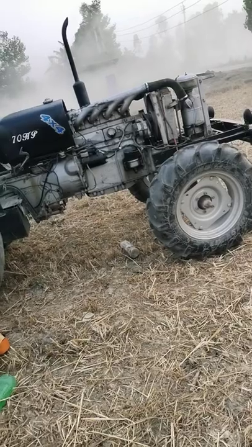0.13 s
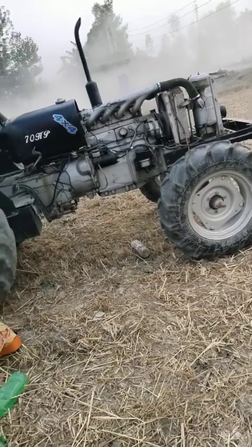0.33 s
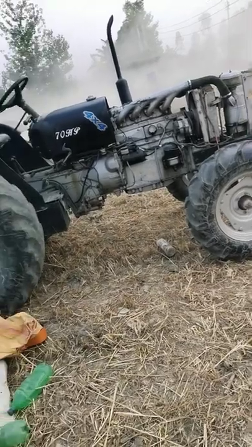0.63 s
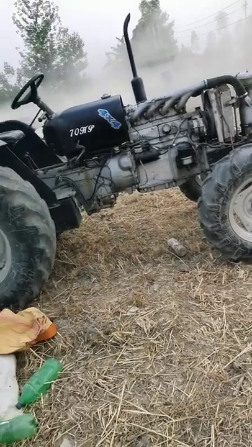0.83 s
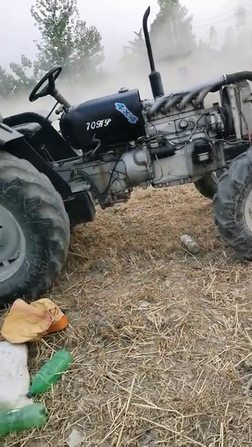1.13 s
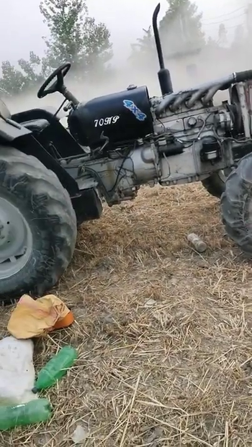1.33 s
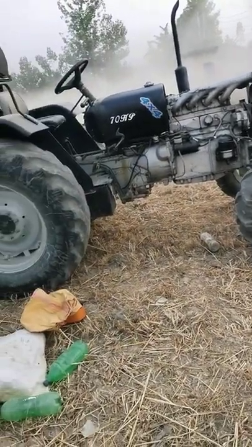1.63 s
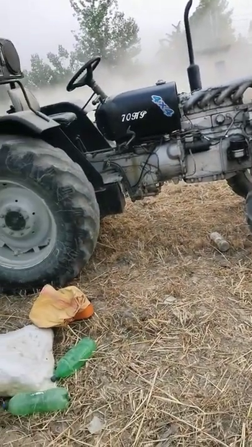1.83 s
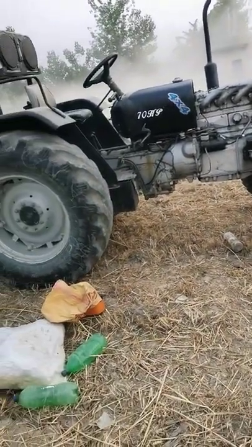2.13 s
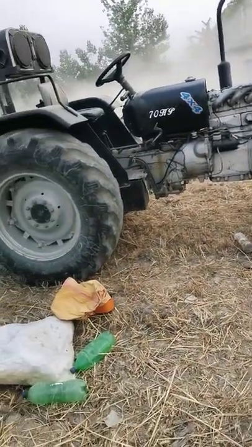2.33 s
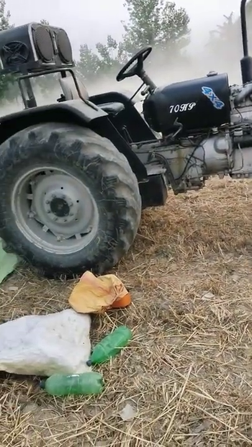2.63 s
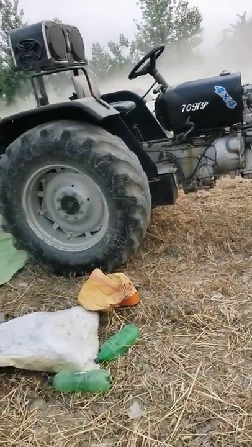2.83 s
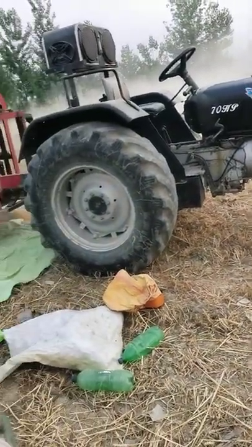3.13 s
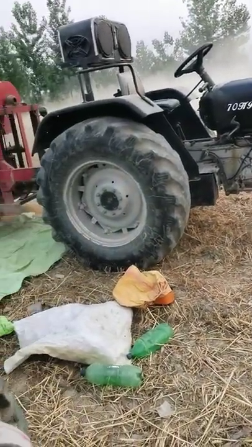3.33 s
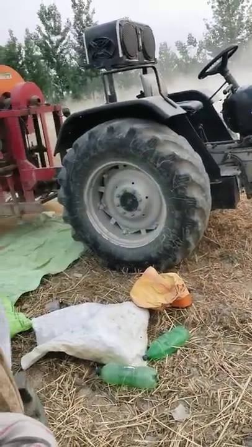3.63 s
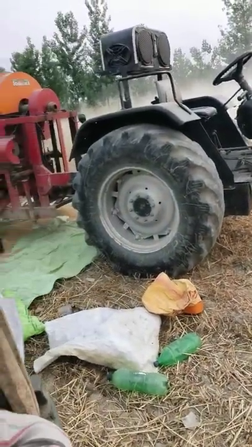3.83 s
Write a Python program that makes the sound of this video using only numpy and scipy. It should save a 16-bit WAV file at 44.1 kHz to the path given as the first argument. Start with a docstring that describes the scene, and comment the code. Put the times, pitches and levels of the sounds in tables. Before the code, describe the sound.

Tractor diesel engine clatters loudly, then drops to a muffled, patchy roar of a thresher

```python
"""Diesel tractor driving a thresher

A four-cylinder engine drones as harmonics of its cycle rate, its cylinders knock as decaying noise bursts
and its gears whine as fluttering lines. The thresher roars as coloured noise, its housing booms as a narrow
noise band, a midrange band swells several times, and grain pelts it as small rings; brief fluttering tones
and a whistle stand out. The microphone opens abruptly and turns to the thresher; a noise suppressor then
turns the sound down and leaves it patchy."""
import sys
import numpy as np
from scipy import signal
from scipy.fft import rfft, irfft
from scipy.io import wavfile
from scipy.ndimage import uniform_filter1d

SR = 44100
rng = np.random.default_rng(int(sys.argv[2]) if len(sys.argv) > 2 else 0)


def master_out(mix):
    """Clip the mix to full scale and print it as 16-bit PCM to the path in sys.argv[1]."""
    frames = np.transpose(np.atleast_2d(mix))
    ceiling = np.clip(frames, -1, 1)
    pcm = np.round(ceiling * 32767).astype(np.int16)
    wavfile.write(sys.argv[1], SR, pcm)


N = 176400
T = np.arange(N) / SR  # s

# cylinders in firing order: place in the cycle/0-1, relative knock level/dB, knock decay/s,
# relative clatter level/dB
CYLINDER_FIRINGS = [(.001, 13, 0.0026, 6), (0.261, 7.5, 0.0069, 7.5), (0.512, 2, 0.0072, 6.5),
                    (0.746, -11, 0.0037, 7.5)]
# resonant response of the engine block: f/Hz, relative level/dB
BLOCK_RESPONSE = [(500, -20), (1400, -13.5), (1850, 1.5), (2080, -1.5), (2280, 4.5), (2550, -6),
                  (2850, -14), (4800, -21.5), (6500, -34), (8000, -34), (11000, -41), (15000, -37)]
# spectrum of the thresher's roar and pelting: f/Hz, relative level/dB
ROAR_SPECTRUM = [(30, -25), (60, -1), (100, -21), (240, -12.5), (390, -2.5), (520, -6.5), (640, -22.5),
                 (800, -23), (1100, -9.5), (1550, -10.5), (1750, -24), (2200, -11.5), (2850, -21.5),
                 (3300, -22.5), (5300, -33), (6400, -40.5), (9800, -43), (12300, -51.5), (14200, -46),
                 (15400, -70)]


def from_db(db):
    """Level to amplitude: 20 dB is a factor of ten."""
    return 10 ** (np.asarray(db) / 20)


def rms_one(x):
    """Normalisation by the root mean square."""
    return x / np.sqrt(np.mean(np.abs(x) ** 2) + 1e-20)


def in_time(rows):
    """Linear interpolation of each column over the time in the first."""
    s, *columns = np.transpose(rows)
    return [np.interp(T, s, column) for column in columns]


def drift(hz):
    """Random modulation: noise through a two-pole low-pass, computed at a reduced rate; rms 1."""
    step, settling = 40, 2000  # samples per slow sample, slow samples discarded
    r = np.exp(-2 * np.pi * hz * step / SR)
    noise = rng.standard_normal(N // step + settling + 2)
    slow = signal.lfilter([1], [1, -2 * r, r * r], noise)[settling:]
    return np.interp(np.arange(N) / step, np.arange(len(slow)), rms_one(slow))


def colour(x, spectrum):
    """Minimum-phase filtering: folding the cepstrum makes the given spectrum causal; rms 1."""
    hz, db = np.transpose(spectrum)
    size = 2 * N
    bins_hz = np.arange(N + 1) * SR / size
    level_db = np.interp(np.log(bins_hz + 1), np.log(hz), db)
    cepstrum = irfft(np.log(from_db(level_db)))
    cepstrum[1:N] *= 2
    cepstrum[N + 1:] = 0
    response = np.exp(rfft(cepstrum))
    return rms_one(irfft(rfft(x, size) * response)[:N])


def tone(turns, rough, flutter_hz):
    """Quadrature modulation: a sinusoid flutters in amplitude and phase; rms 1."""
    angle = 2 * np.pi * (turns + rng.random())
    in_phase = (1 + rough * drift(flutter_hz)) * np.cos(angle)
    quadrature = rough * drift(flutter_hz) * np.sin(angle)
    return rms_one(in_phase + quadrature)


def burst(times, db, decay_s):
    """Impulse excitation: each time starts decaying noise, partly repeated and partly fresh."""
    spread_db, repeated = .6, .7  # level deviation, repeated share of the power
    hits = np.zeros(N)
    at = (times[(times > 0) & (times < T[-1])] * SR).astype(int)
    hits[at] = from_db(db + spread_db * rng.standard_normal(len(at)))
    fade = np.exp(-T[:SR // 20] / decay_s)
    same = signal.oaconvolve(hits, fade * rng.standard_normal(len(fade)))[:N]
    fresh = signal.oaconvolve(hits, fade)[:N] * rng.standard_normal(N)
    return np.sqrt(repeated) * same + np.sqrt(1 - repeated) * fresh


def throb(cycles, depth_db):
    """Amplitude modulation at the firing rate: the level swings by plus and minus the depth; rms 1."""
    angle = 2 * np.pi * len(CYLINDER_FIRINGS) * cycles - np.pi / 3
    return rms_one(from_db(depth_db * np.cos(angle)))


def resonance(rows, half_width_hz):
    """Frequency translation: low-passed complex noise is shifted to a moving centre frequency."""
    hz, db = in_time(rows)
    low_pass = signal.butter(2, half_width_hz, fs=SR, output="sos")
    a, b = signal.sosfilt(low_pass, rng.standard_normal((2, N)))
    # even out the slow swings in power
    power = uniform_filter1d(a * a + b * b, size=4000) / 2
    ring = (a + 1j * b) / np.sqrt(power + 1e-20)
    return from_db(db) * np.real(ring * np.exp(2j * np.pi * np.cumsum(hz) / SR))


def damped_ring(hits, f_hz, t60_s, zeros):
    """A two-pole resonator: each impulse rings and falls by 60 dB in the decay time."""
    r = from_db(-60 / (t60_s * SR))
    poles = [1, -2 * r * np.cos(2 * np.pi * f_hz / SR), r * r]
    return signal.lfilter(zeros, poles, hits + 1e-18)


def crank_cycles():
    """Phase as the integral of speed: a four-stroke cycle takes two revolutions."""
    # crankshaft speed: t/s, speed/rpm
    speed = [(.4, 1735), (1.15, 1743.6), (2, 1756), (2.9, 1761), (3.4, 1754), (4, 1750)]
    first_firing_s = .4065  # a cycle starts here
    cycles = np.cumsum(in_time(speed)[0]) / 120 / SR
    return cycles - np.interp(first_firing_s, T, cycles)


def exhaust(cycles):
    """Harmonic synthesis on the cycle rate, the higher orders being rougher."""
    # exhaust orders: multiple of the cycle rate, relative level/dB
    orders = [(4, -17), (5, -24), (6, -19), (7, -7.5), (8, -10), (9, -9), (10, -9.5), (11, -18.5),
              (12, -15), (14, -11.5), (15, -14.5), (17, -28), (18, -13.5), (19, -6), (20, -5.5), (21, -7),
              (22, -8.5), (23, -13), (24, -1.5), (25, -4.5), (26, 2), (27, -2.5), (28, 0.5), (29, -8.5),
              (30, -6)]
    rough_per_order = .022
    drone = sum(from_db(db) * tone(k * cycles, rough_per_order * k, flutter_hz=5.4) for k, db in orders)
    return from_db(-33) * rms_one(drone)


def combustion(cycles):
    """Impulsive excitation: firings knock on the block and ring it; the covers clatter just after."""
    # resonant response of the engine covers: f/Hz, relative level/dB
    covers = [(250, -29), (560, -14), (720, -1.5), (1000, 2), (1150, -6.5), (1600, -8), (3000, -14.5),
              (5500, -23), (9000, -47.5)]
    clatter_lag_s, clatter_decay_s = .0031, .0065
    knock = clatter = 0
    for place, knock_db, decay_s, clatter_db in CYLINDER_FIRINGS:
        times = np.interp(np.arange(-1, cycles[-1]) + place, cycles, T)
        knock = knock + burst(times, knock_db, decay_s)
        clatter = clatter + burst(times + clatter_lag_s, clatter_db, clatter_decay_s)

    # the main ring is struck at even quarters of the cycle, with random sign
    count = np.floor(len(CYLINDER_FIRINGS) * cycles)
    firings = np.diff(count, prepend=count[0]) * rng.choice([-1, 1], N)
    ring = damped_ring(firings, f_hz=2270, t60_s=.034, zeros=[1, 0, -1])
    return (from_db(-36.5) * colour(knock, BLOCK_RESPONSE)
            + from_db(-35.5) * colour(clatter, covers)
            + from_db(-45) * colour(ring, BLOCK_RESPONSE))


def hard_knocks():
    """Impulsive excitation at set times: very short bursts crack sharply through the block."""
    # sharp knocks: t/s, level/dB (their mean sets the rms of the whole layer)
    knocks = [(.6335, -50), (.7005, -45), (.7515, -50), (.9085, -47), (1.371, -49), (1.5772, -49),
              (1.714, -47)]
    s, db = np.transpose(knocks)
    return from_db(db.mean()) * colour(burst(s, db, decay_s=.0015), BLOCK_RESPONSE)


def gear_whine(cycles):
    """Gear meshing: lines at fixed multiples of the crank rate, two revolutions to a cycle."""
    # whine frequencies: multiple of the crank rate
    orders = [21.87, 26, 53.7, 65.2, 72.6, 104, 117.3]
    # their levels in the same order: level/dB, before the dip
    levels = [-47, -42.5, -49, -49, -50, -60, -60]
    # level of the gear whine, dipping and recovering: t/s, gain/dB
    whine_level = [(1.7, -2), (2.1, -6.5), (3.6, 0.5)]
    flutter_hz = 14
    whine = sum(from_db(db) * tone(2 * k * cycles, .6, flutter_hz) for k, db in zip(orders, levels))
    # the main mesh is a firmer line
    main_mesh = from_db(-36.5) * tone(2 * 78 * cycles, .3, flutter_hz)
    return from_db(in_time(whine_level)[0]) * (whine + main_mesh)


def fan_rush(cycles):
    """Turbulent flow: coloured noise swells slightly at the firing rate."""
    # spectrum of the engine fan's rush: f/Hz, relative level/dB
    spectrum = [(30, -37.5), (60, -5.5), (200, -8), (350, 2), (560, -12.5), (750, -4), (1000, 1.5),
                (1250, -6), (1650, -5), (1900, -2), (2500, -3.5), (2850, -14), (4200, -15), (5600, -22),
                (6500, -30), (7800, -28.5), (10500, -37.5), (13000, -41.5), (15000, -39.5)]
    return from_db(-31) * colour(throb(cycles, .5) * rng.standard_normal(N), spectrum)


def engine(cycles):
    """Superposition of the engine's drone, whine, knocks and rush."""
    return exhaust(cycles) + gear_whine(cycles) + combustion(cycles) + hard_knocks() + fan_rush(cycles)


def drum_hum(cycles):
    """Harmonics of rotation: the belted drum turns at a fixed ratio to the engine."""
    # drum orders: multiple of the drum's turning rate, level/dB
    orders = [(2, -48.5), (3, -65)]
    turns = 1.75 * cycles
    return sum(from_db(db) * tone(k * turns, .12, flutter_hz=5.6) for k, db in orders)


def roar(cycles):
    """Broadband flow noise of air and straw, modulated at the firing rate."""
    return from_db(-30) * colour(rng.standard_normal(N) * throb(cycles, 2.5), ROAR_SPECTRUM)


def pelting(count=60):
    """Random impacts: grain and straw strike sheet metal, each hit ringing at one of many pitches."""
    hits_per_s, spread_db = 700, 3
    born = rng.random(N) < hits_per_s / SR
    sizes = born * from_db(spread_db * rng.standard_normal(N)) * rng.choice([-1, 1], N)
    dealt = rng.integers(0, count, N)  # which pitch each hit excites
    t60_s = .033
    r = from_db(-60 / (t60_s * SR))
    rings = 0
    for k, f_hz in enumerate(np.geomspace(900, 12000, count)):
        zeros = [1, -r * np.cos(2 * np.pi * f_hz / SR)]  # a damped cosine
        rings = rings + damped_ring(sizes * (dealt == k), f_hz, t60_s, zeros)
    return from_db(-38) * colour(rings, ROAR_SPECTRUM)


def housing_boom():
    """Resonance of the housing: a narrow low noise band wanders in pitch and level."""
    # boom of the thresher housing: t/s, f/Hz, level/dB
    curve = [(.4, 380, -48), (1.7, 380, -38.5), (2, 385, -30), (2.15, 370, -35), (2.45, 375, -39.5),
             (2.57, 375, -31), (2.8, 425, -29.5), (2.97, 380, -38), (3.06, 392, -25), (3.2, 420, -32.5),
             (3.35, 415, -27.5), (3.5, 390, -38), (3.64, 335, -28), (3.78, 390, -34.5), (3.91, 400, -23),
             (4, 410, -26.5)]
    return resonance(curve, half_width_hz=41.4)


def midrange_swells():
    """Band-limited noise: a midrange noise band swells several times, at differing pitches."""
    # midrange noise band: t/s, f/Hz, level/dB
    curve = [(.4, 1156, -42), (2.25, 1144, -37), (2.42, 1229, -36), (2.62, 1147, -32.5), (2.8, 1220, -36.5),
             (2.96, 1273, -34), (3.15, 1103, -37), (3.25, 1280, -44), (3.45, 1207, -39), (3.58, 1200, -55),
             (3.78, 1290, -31.5), (4, 1290, -63)]
    return resonance(curve, half_width_hz=150)


def thresher(cycles, near_db):
    """Superposition: the turn towards the thresher acts on the roar and the pelting only."""
    turned = from_db(near_db) * (roar(cycles) + pelting())
    return drum_hum(cycles) + turned + housing_boom() + midrange_swells()


def brief_tones():
    """Windowed tones: each fluttering line swells and dies under half a cosine."""
    # brief tones that stand out of the roar: middle t/s, f/Hz, level/dB
    tones = [(1.87, 1580, -33), (1.94, 2087, -35.5), (2.06, 2105, -32), (2.17, 4890, -57),
             (2.27, 4210, -50.5), (2.35, 3220, -49), (2.411, 2070, -35), (2.638, 1590, -43),
             (2.73, 5500, -53), (2.93, 5270, -51), (3.151, 1580, -45), (3.22, 3230, -48), (3.44, 4070, -54),
             (3.49, 5790, -55), (3.611, 3840, -49.5), (3.77, 4130, -49), (3.92, 3780, -52)]
    length_s = .11
    out = np.zeros(N)
    for s, hz, db in tones:
        swell = np.cos(np.pi * np.clip((T - s) / length_s, -.5, .5))
        out += from_db(db) * swell * tone(hz * T, rough=1, flutter_hz=80)
    return out


def whistle(cycles):
    """Narrow-band noise with a moving centre, amplitude-modulated at the firing rate."""
    # thin whistle: t/s, f/Hz, level/dB
    curve = [(.4, 7780, -71), (2.1, 7560, -62.5), (2.6, 7590, -57), (2.9, 7650, -57.5), (3.27, 8170, -62),
             (3.37, 8160, -80), (3.7, 8600, -66), (4, 8800, -66)]
    return throb(cycles, 7) * resonance(curve, half_width_hz=130)


def scene():
    """Common phase: one crankshaft drives the engine and thresher as the microphone turns."""
    # turning from engine to thresher: t/s, engine gain/dB, thresher gain/dB
    turn = [(.4, 2, -12), (1.7, 1.5, -14.5), (2.5, 0.5, -1.5), (3.3, -3.5, 1.5), (4, -3, 1.5)]
    cycles = crank_cycles()
    engine_db, thresher_db = in_time(turn)
    machines = from_db(engine_db) * engine(cycles) + thresher(cycles, thresher_db)
    return (machines + whistle(cycles) + brief_tones())[None]


def suppressor(x):
    """Spectral gain: bands are turned down, less where they briefly exceed their steady power."""
    # how slowly each band is turned down: f/Hz, time constant/s
    fade = [(400, 0.082), (650, .025), (2500, 0.1)]
    start_s, reduction_db = 1.773, -13
    slope, least_db, most_db = 3.5, -2.5, 7  # dB passed per dB of excess, and its limits
    full_hz = 1030  # below this the bass is turned down more evenly
    hz, s, z = signal.stft(x, SR, nperseg=1024)
    power = uniform_filter1d(np.abs(z) ** 2, size=5, axis=1)
    recent = uniform_filter1d(uniform_filter1d(power, size=8, axis=2), size=4, axis=2)
    steady = uniform_filter1d(power, size=80, axis=2)
    excess_db = 10 * np.log10(np.abs(recent / (steady + 1e-20)) + 1e-9)
    # excess over the neighbouring bands
    excess_db = excess_db - uniform_filter1d(excess_db, size=24, axis=1)
    passed_db = np.clip(slope * excess_db, least_db, most_db) * np.minimum(hz / full_hz, 1)[:, None]
    fade_s = np.interp(hz, *np.transpose(fade))[:, None]
    engaged = 1 - np.exp(-np.maximum(s - start_s, 0) / fade_s)
    return signal.istft(z * from_db(engaged * (reduction_db + passed_db)), SR)[1][:, :N]


def record(dry):
    """Gating and band limiting: the suppressor works, the microphone opens, bottom and top are cut."""
    open_s, edge_s = .3665, .0015
    open_db, rise_s = -4, .087  # initial level and the time it takes to reach 0 dB
    since_s = T - open_s
    edge = np.sin(np.pi / 2 * np.clip(since_s / edge_s, 0, 1)) ** 2
    opening = edge * from_db(open_db * np.clip(1 - since_s / rise_s, 0, 1))
    low_cut = signal.butter(8, 43, "high", fs=SR, output="sos")
    high_cut = signal.ellip(16, .1, 80, 15400, fs=SR, output="sos")
    x = signal.sosfilt(low_cut, suppressor(dry) * opening)
    return signal.sosfilt(high_cut, x)


dry = scene()
out = record(dry)
master_out(out)
```